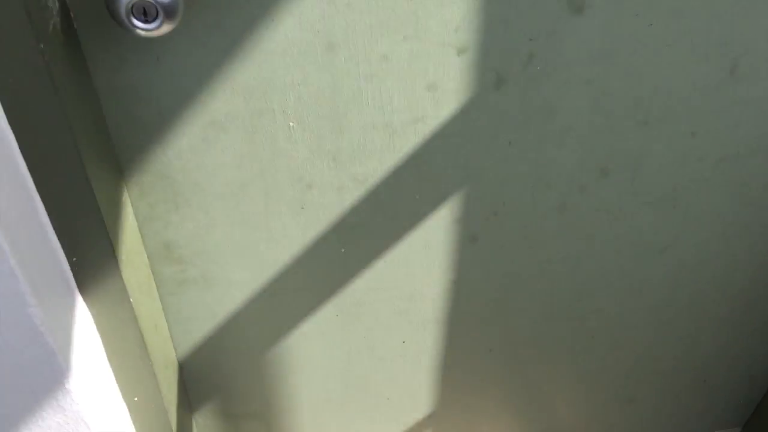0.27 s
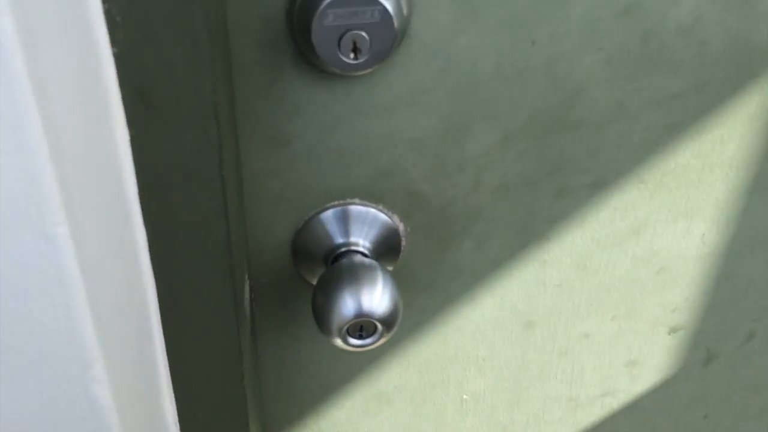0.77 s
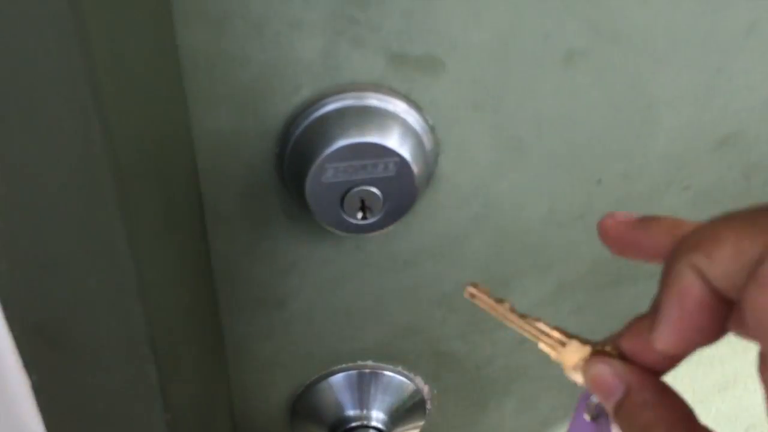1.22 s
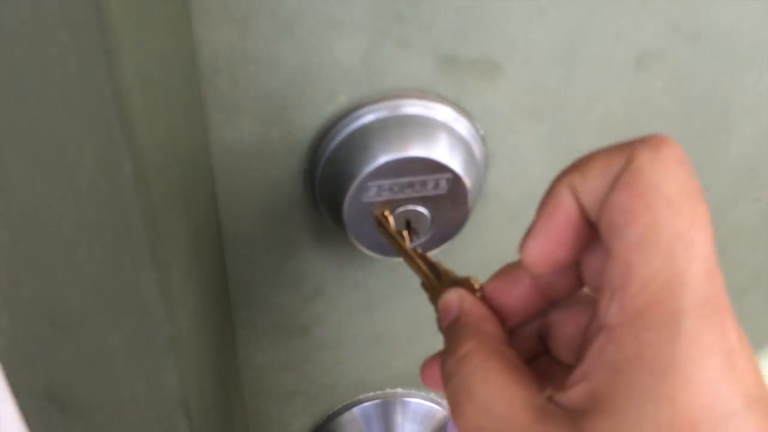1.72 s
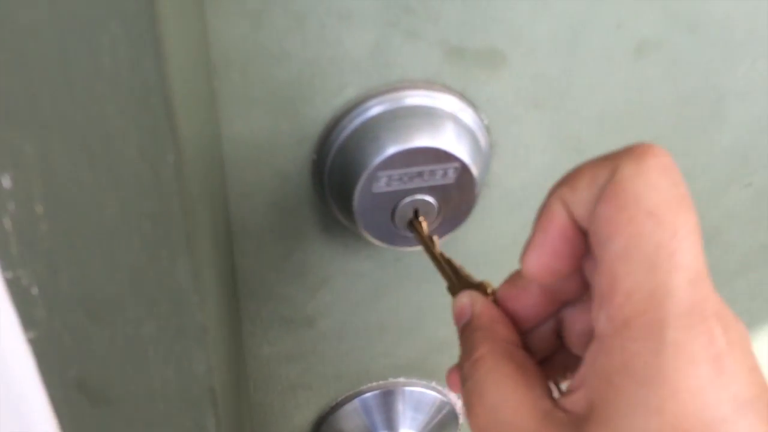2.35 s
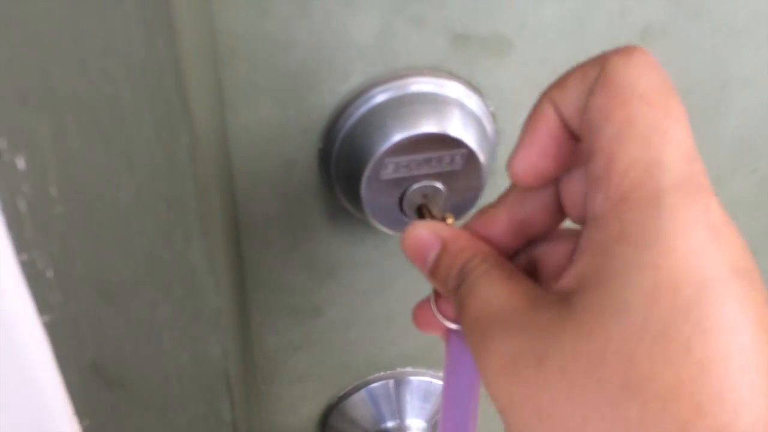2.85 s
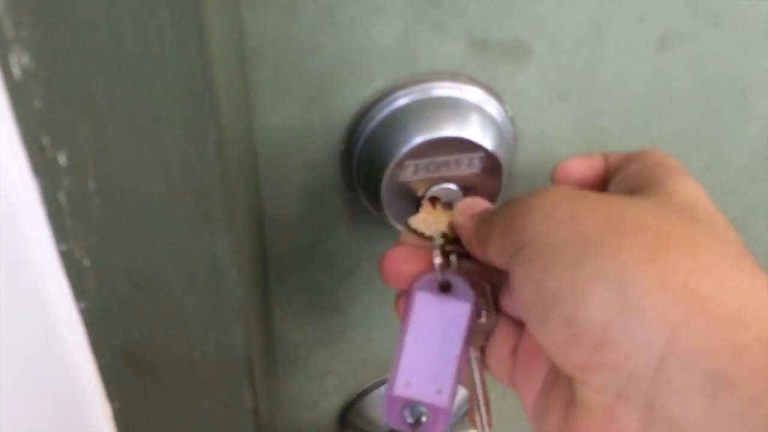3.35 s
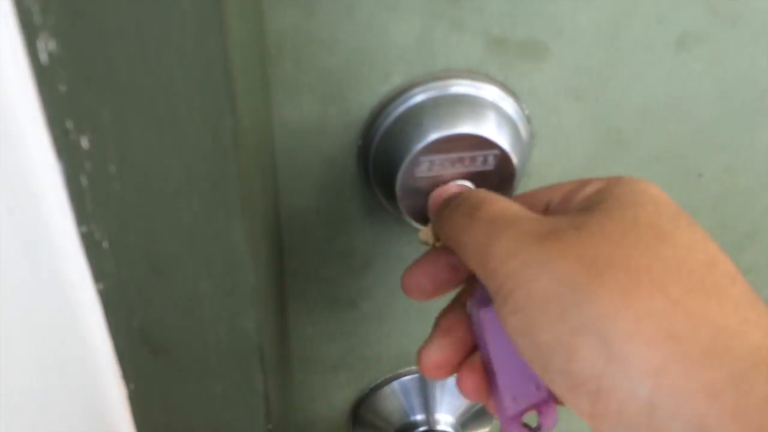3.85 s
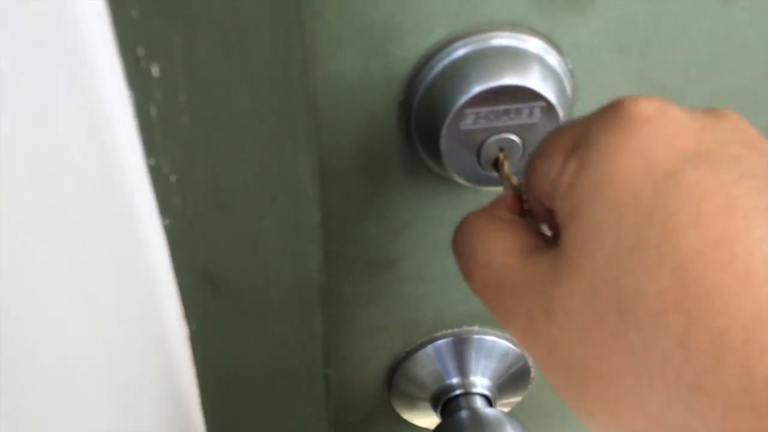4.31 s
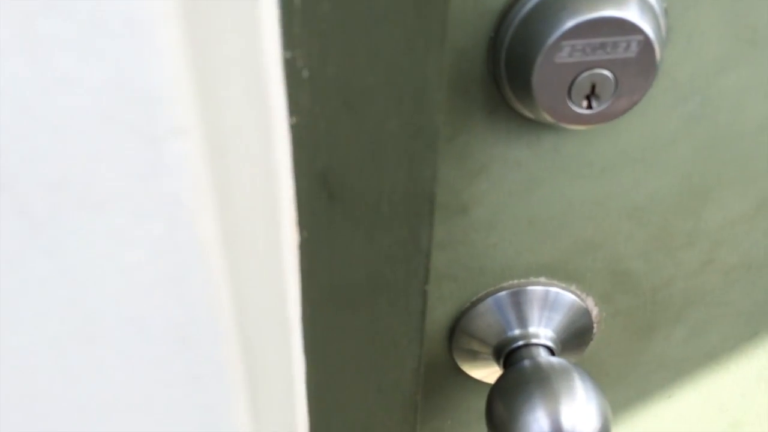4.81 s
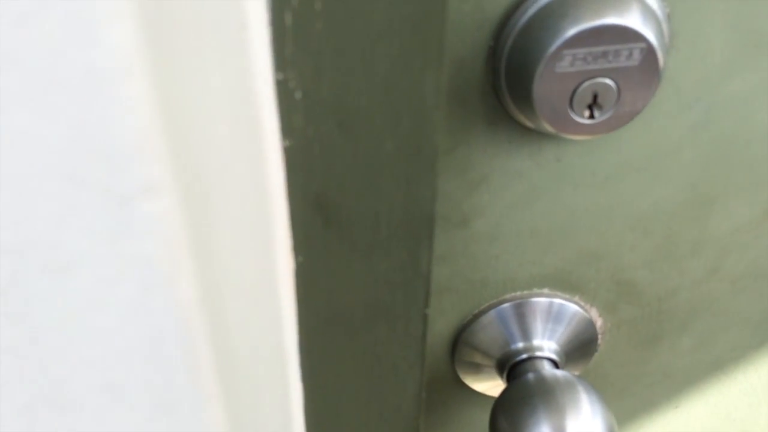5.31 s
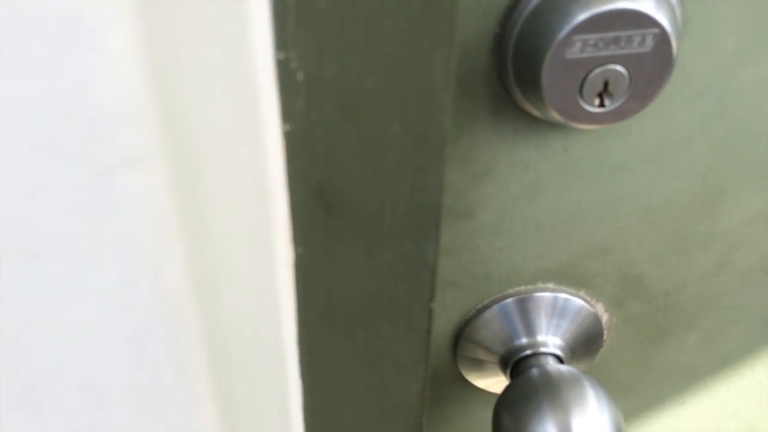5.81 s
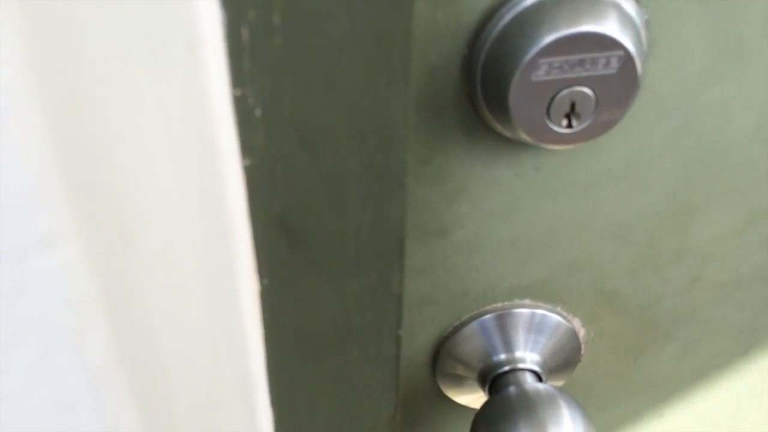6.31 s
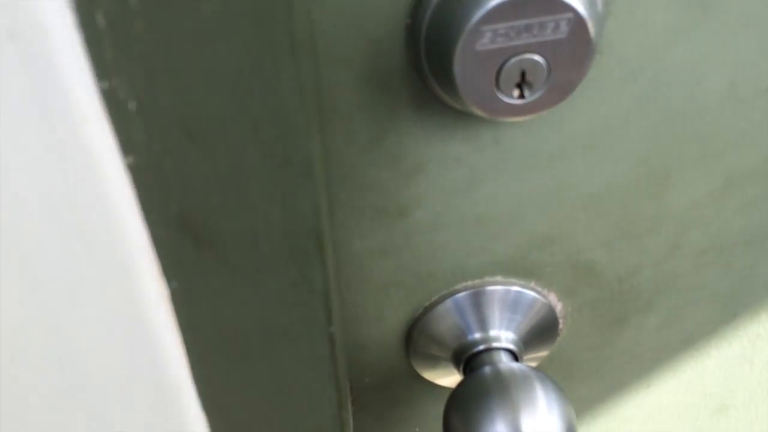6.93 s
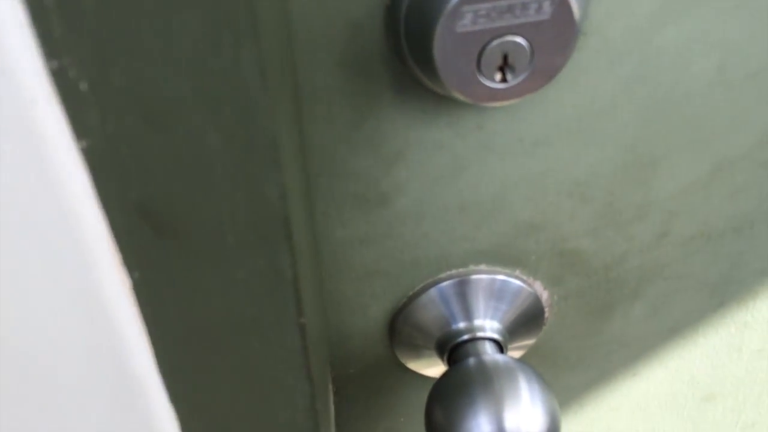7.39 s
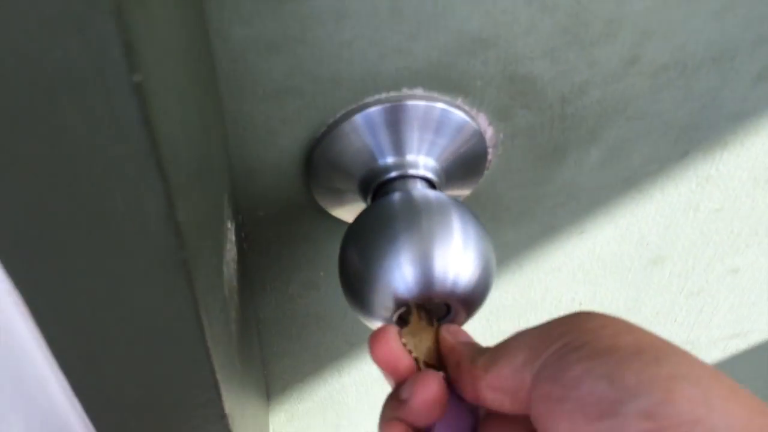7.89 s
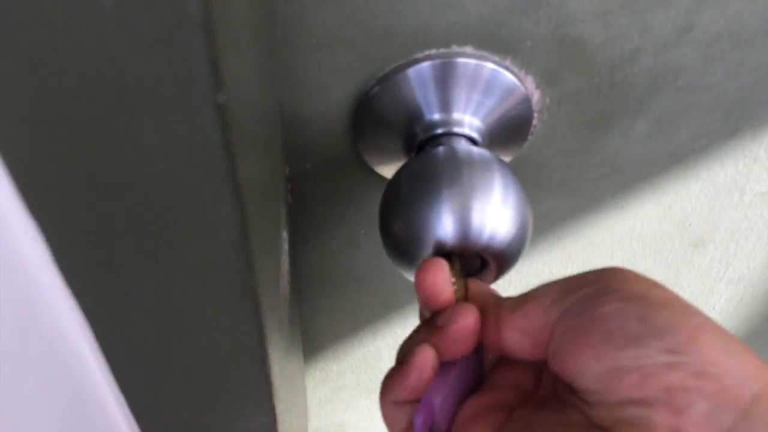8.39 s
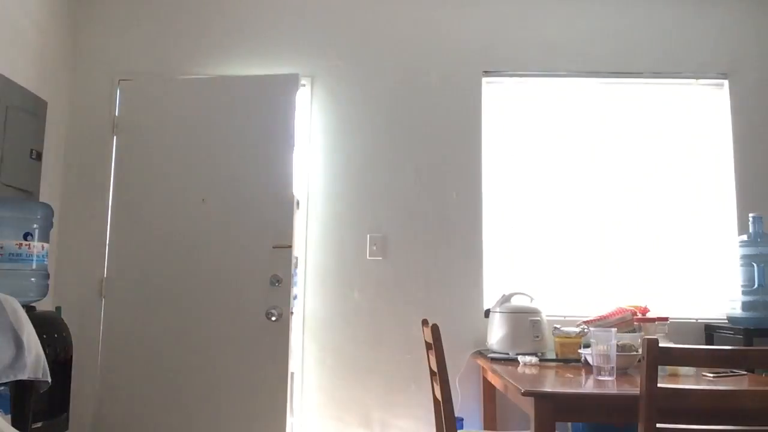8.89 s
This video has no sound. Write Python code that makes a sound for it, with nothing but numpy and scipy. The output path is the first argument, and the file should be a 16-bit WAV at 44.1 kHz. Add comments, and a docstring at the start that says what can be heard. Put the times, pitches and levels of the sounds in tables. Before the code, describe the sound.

A bunch of keys jangles brightly, a key slides into a deadbolt, the bolt clacks over, then a doorknob rattles and clunks, close up over faint outdoor rumble.

```python
"""Keys working a front door lock

A bunch of keys is pulled out, pushed into the deadbolt, turned and drawn out, then worked in the knob.
Keys ring in thin high modes; lock parts, knob and door leaf knock as noise bursts plus their own modes;
brass scrapes as streams of tiny contacts, and the swinging bunch jangles as flurries of small collisions.
A hand-held phone is close by in the doorway, bumped now and then, over a low outdoor rumble and faint wash."""
import sys
import numpy as np
from scipy import signal
from scipy.fft import rfft, irfft, next_fast_len
from scipy.io import wavfile
from scipy.ndimage import uniform_filter1d

SR = 44100
rng = np.random.default_rng(int(sys.argv[2]) if len(sys.argv) > 2 else 0)


def dump(signal):
    """Clip the signal to [-1, 1] and save it as 16-bit WAV at the path in sys.argv[1]."""
    limited = np.clip(np.atleast_2d(signal).T, -1, 1)
    pcm = np.round(limited * 32767).astype(np.int16)
    wavfile.write(sys.argv[1], SR, pcm)


N = 403515
TIME = np.arange(N) / SR
AGE = TIME[:SR // 3]  # time since a contact [s]

# ringing keys, by name: (t60_s, [(pitch_hz, level_db)]); brass is in hand, the rest hang on the split ring
KEY_MODES = {"brass": (.16, [(4070, -21), (5370, -20), (6236, -15), (8080, -17), (9560, -12), (9800, -6),
             (10162, -10), (11700, -16), (12487, -10), (13662, 0), (14900, -16)]),
             "steel": (.16, [(2475, -19), (6750, -20), (7287, -3), (10222, -14), (10903, -12), (11400, -13),
             (12791, 0)]), "small": (.2, [(7390, -9), (9701, -14), (11686, 0), (12586, -4)]),
             "long": (.4, [(4270, 0)]), "short": (.25, [(4620, 0), (12800, 0)]), "ring": (.12, [(6300, -10),
             (10768, -10), (11183, -4), (14007, 0), (14096, -1), (14295, -7), (14426, -2)])}
# modes of lock case, bolt, latch, hollow knob and door leaf, by name: [(pitch_hz, level_db)]
PART_MODES = {"case": [(800, -7), (960, -5), (1205, -6), (1480, -3), (1720, -3), (2230, 1)],
              "bolt": [(440, -9), (590, -5), (935, 3), (1185, -2), (1340, -4), (5500, -5), (8550, -2)],
              "latch": [(600, -10), (1045, -4), (1205, 0), (1325, -1), (1935, -4), (2450, -7), (4480, -8)],
              "knob": [(1520, -7), (1930, 1), (3100, -3), (3500, -6), (7000, -4)], "leaf": [(155, -3),
              (237, 0), (330, 0), (436, -2), (1250, -8)]}
# spectrum of knocks and rubs in lock and door: (pitch_hz, level_db)
KNOCK_COLOUR = [(100, -16.5), (300, -3.5), (600, -2.5), (1100, 2), (1600, -1), (2200, -4), (3200, -8.5),
                (5000, -19.5), (8000, -26), (15000, -36.5)]
# spectrum of hard metal clicks and ticks: (pitch_hz, level_db)
STEEL_COLOUR = [(500, -25.5), (2000, -11), (4000, -4), (6000, -2.5), (8000, 0), (10000, 2), (13500, -2),
                (15500, 1.5)]
UNEVEN_DB = 2.5  # spread of the chance resonances at the spot touched
PLAY_DETUNE = .06  # relative spread of pitch of loose parts and swinging keys


def undb(db):
    """Decibels to gain."""
    return 10 ** (np.asarray(db) / 20)


def unit(x):
    """Scale to rms 1."""
    return x / np.sqrt(np.mean(x ** 2))


def unit_peak(x, size):
    """Scale so that the loudest stretch of size samples has rms 1."""
    return x / np.sqrt(uniform_filter1d(x ** 2, size).max())


def add(track, s, x):
    """Mix x into the track at time s."""
    i = max(int(s * SR), 0)
    track[i:i + len(x)] += x[:max(N - i, 0)]


def colour(x, points, tilt_db=0, uneven_db=0):
    """Minimum-phase filter: a (Hz, dB) spectrum, a tilt per octave (256 Hz to 8 kHz), chance resonances."""
    size = next_fast_len(len(x) + 2048) // 2 * 2
    freq = np.maximum(np.arange(size // 2 + 1) * SR / size, 1)
    octave = np.log2(freq)
    hz, points_db = np.transpose(points)
    db = np.interp(octave, np.log2(hz), points_db)
    db = db + tilt_db * np.clip(octave - 10, -2, 3)
    db = db + uneven_db * np.interp(np.sqrt(freq) / 2, np.arange(80), rng.standard_normal(80))
    # folding the cepstrum keeps the filter causal, so attacks stay sharp
    cepstrum = irfft(np.log(undb(db)))
    cepstrum[1:size // 2] *= 2
    cepstrum[size // 2 + 1:] = 0
    return irfft(rfft(x, size) * np.exp(rfft(cepstrum)))[:len(x)]


def fade(t60):
    """Exponential decay by 60 dB in t60 seconds."""
    return np.exp(-np.log(1000) * AGE / max(t60, 1e-4))


def walk(rate, time=TIME):
    """Smooth random drift with a spread near 1 and rate random steps a second."""
    steps = rng.standard_normal(1024)
    return np.interp(time * rate, np.arange(len(steps)), steps)


def grains(size, rate, spread_db):
    """Random tiny contacts, about rate of them a second, of uneven strength."""
    present = rng.random(size) < rate / SR
    sign = rng.choice([-1, 1], size)
    return present * sign * undb(spread_db * np.clip(rng.standard_normal(size), -2, 2))


def ring(modes, scatter_db):
    """Free vibration of (Hz, dB, t60) modes; chance in the point of contact sets the share of each."""
    tone = 0
    for hz, db, t60 in modes:
        share = undb(db + scatter_db * rng.standard_normal()) * rng.choice([-1, 1])
        tone = tone + share * fade(t60) * np.sin(2 * np.pi * hz * AGE)
    return tone


def resonate(x, hz, t60):
    """One mode driven by x, with a gain of 1 for noise."""
    r = np.exp(-np.log(1000) / (t60 * SR))
    angle = 2 * np.pi * hz / SR
    gain = np.sin(angle) * np.sqrt(2 * (1 - r * r))
    return signal.lfilter([gain], [1, -2 * r * np.cos(angle), r * r], x)


def burst(t60, tail_db, tail_t60):
    """A crack that builds as the surfaces meet, then a weaker tail of tiny rebounds."""
    rebounds = unit(grains(len(AGE), rate=1800, spread_db=-2))
    crack = rng.standard_normal(len(AGE)) * fade(t60)
    return (crack + undb(tail_db) * rebounds * fade(tail_t60)) * (1 - fade(0.0045))


def slide(length, tilt_db):
    """Surfaces catch and slip in a gritty stream that swells quickly and dies away."""
    progress = np.minimum(AGE / length, 1)
    pressure = np.sin(np.pi * progress ** 0.61) * undb(2.5 * walk(160, AGE))
    grit = grains(len(AGE), rate=3500, spread_db=0.0)
    return pressure * unit(colour(grit, KNOCK_COLOUR, tilt_db, UNEVEN_DB))


def clinks():
    """Each touch gives a hard click and rings one key, most strongly in the modes the contact favours."""
    # key against key or lock face: (start_s, ring_db, click_db, key, favoured_hz)
    touches = [(0.816, -32, -46, "brass", 13700), (0.859, -31.5, -27, "small", 11700),
               (.878, -45, -42.5, "long", 4270), (.941, -24.5, -20, "brass", 10020),
               (0.996, -49.5, -26.5, "small", 9900), (1.012, -42.5, -45.5, "long", 4270),
               (1.104, -28, -24.5, "ring", 14300), (1.115, -20.5, -31, "ring", 12300),
               (1.137, -28.5, -29, "ring", 14600), (1.187, -35.5, -36.5, "brass", 12760),
               (1.403, -45.5, -37.5, "brass", 9900), (1.77, -17.5, -21, "brass", 9900),
               (1.8, -36, -33, "brass", 12300), (2.496, -47, -29, "brass", 10000),
               (2.534, -38.5, -52, "brass", 9860), (3.064, -20, -34, "brass", 14050),
               (3.116, -27.5, -32.5, "brass", 10250), (3.227, -25, -30, "brass", 13600),
               (3.281, -30.5, -32, "brass", 13700), (3.583, -40.5, -37.5, "brass", 12600),
               (3.809, -34.5, -39.5, "brass", 10190), (3.964, -39.5, -35, "brass", 10040),
               (4.514, -28.5, -34, "brass", 13500), (4.768, -21.5, -30, "steel", 11740),
               (4.823, -38.5, -36, "steel", 7300), (7.357, -29.5, -31, "brass", 13700),
               (7.528, -58, -55.5, "short", 4620), (7.661, -54.5, -46.5, "short", 12800),
               (8.18, -50.5, -46, "small", 12120), (8.658, -46, -35, "brass", 9900)]
    contact_db, contact_octaves = 7, 0.078  # lift of modes near the favoured pitch, and its reach
    grip_detune = .005  # relative spread of pitch of the held key from touch to touch
    choke_s = 0.047  # damping time of the held key after a light touch
    press_db, press_db_per_halving = -30.5, 10.5  # clicks above press_db shorten the ring
    graze_s, graze_db = 0.0083, -18.5  # a swinging key grazes its neighbour just before the touch
    out = np.zeros(N)
    for s, ring_db, click_db, key, favoured_hz in touches:
        t60, free = KEY_MODES[key]
        detune = grip_detune * (key == "brass") * rng.standard_normal(len(free))
        modes = []
        for (hz, db), shift in zip(free, detune):
            distance = np.log2(hz / favoured_hz) / contact_octaves
            modes.append((hz * (1 + shift), db + contact_db * np.exp(-distance ** 2), t60))
        # the ring flutters as the key chatters against its neighbours
        tone = ring(modes, scatter_db=2) * undb(2.5 * walk(400, AGE))
        if key == "brass":
            # the harder the held key lands, the sooner it is choked
            choke = choke_s * 2 ** (-max(click_db - press_db, 0) / press_db_per_halving)
            tone = tone * np.exp(-(AGE / choke) ** 2)
        else:
            graze = unit_peak(tone, size=88) * fade(0.04)
            add(out, s - graze_s, undb(ring_db + graze_db) * graze)
        crack = burst(t60=.005, tail_db=-16, tail_t60=.07)
        click = unit_peak(colour(crack, STEEL_COLOUR, 0, UNEVEN_DB), size=88)
        add(out, s, undb(ring_db) * unit_peak(tone, size=88) + undb(click_db) * click)
    return out


def jangle():
    """The harder the bunch is shaken, the louder and more often keys collide, in flurries."""
    sing_db, chafe_db = -19, -20  # keys sliding on each other: their singing modes; their hiss
    shake_db = shaking()
    rate = np.interp(shake_db, [-60, -30], [90, 380])  # typical collisions per second
    hits = [collision() for _ in range(64)]
    chance, strength_db = rng.random(N), rng.uniform(-14, 5, N)
    which = rng.integers(len(hits), size=N)
    flurries = undb(4 * walk(35))
    out = np.zeros(N)
    for i in np.flatnonzero(chance < rate * flurries / SR):
        # sparser hits are each stronger, so the rate alone does not set the level
        gain = undb(shake_db[i] + strength_db[i] - 5.5) * np.sqrt(SR / rate[i])
        add(out, i / SR, gain * hits[which[i]])
    # blades also slide on each other between collisions, which keeps their modes softly singing
    hiss = unit(colour(rng.standard_normal(N), STEEL_COLOUR))
    chafe = undb(shake_db + 2 * walk(60)) * hiss
    singing = np.zeros(N)
    for t60, free in KEY_MODES.values():
        for hz, db in free:
            singing += undb(db / 2) * resonate(chafe, hz, t60)  # halved dB evens out the modes
    return out + undb(chafe_db) * chafe + undb(sing_db) * unit(singing) * chafe.std()


def shaking():
    """How hard the bunch moves, in dB: every swing swells and settles, and the strongest one leads."""
    # swings and jolts of the bunch: (hardest_s, level_db, swell_by_20_db_s)
    swings = [(.95, -38, 0.702), (.845, -33, 0.2568), (.935, -25, 0.2042), (0.994, -31.5, 0.14),
              (1.119, -24.5, 0.0581), (1.822, -26, 0.0382), (1.976, -26.5, 0.0245), (2.15, -45, 0.295),
              (2.62, -49, 0.02), (2.98, -43, 0.2481), (3.24, -36, 0.1266), (3.94, -49.5, 0.584),
              (5.11, -52, 0.09), (6.38, -41.5, 0.1475), (7.501, -51, 0.5)]
    settle_ratio = 0.674  # settling time over swell time: the bunch settles faster than it swells
    held_db = -71.5  # stirring of the keys in a quiet hand
    shake_db = np.full(N, held_db)
    for s, db, swell in swings:
        away = np.maximum(s - TIME, (TIME - s) / settle_ratio)
        shake_db = np.maximum(shake_db, db - 20 * away / swell)
    return shake_db


def collision():
    """Two keys of the bunch meet: a short chafe and a few modes, damped and detuned by the hand."""
    modes = []
    for key in ("brass", "small", "ring"):
        t60, free = KEY_MODES[key]
        modes += [(hz, db / 2, t60 / 2) for hz, db in free]
    struck = [modes[i] for i in rng.choice(len(modes), size=5, replace=False)]
    detuned = [(hz * (1 + PLAY_DETUNE * rng.standard_normal()), db, t60) for hz, db, t60 in struck]
    tone = ring(detuned, scatter_db=3)
    crack = burst(t60=0.0059, tail_db=-19.0, tail_t60=0.052)
    chafe = colour(crack, STEEL_COLOUR, 0, UNEVEN_DB)
    hit = unit(tone) + unit(chafe)
    return hit[:SR // 5] / np.sqrt(len(hit))


def knocks():
    """Each knock is a dense noise burst with a steel tick, over the ringing modes of one part."""
    # knocks of lock parts, knob and door leaf, and a footstep at the start:
    # (start_s, knock_db, tick_db, tilt_db_per_octave, part)
    strikes = [(0.268, -36, -70, 2, "leaf"), (1.094, -31, -31, -0.5, "case"),
               (1.115, -32.5, -39, 2, "case"), (1.77, -29, -27.5, 3.5, "case"),
               (1.8, -37.5, -39.5, -2, "case"), (2.497, -32.5, -62, 2.5, "case"),
               (2.668, -45.5, -35.5, -3, "case"), (3.001, -34, -28.5, -3.5, "latch"),
               (3.05, -32.5, -25.5, 2, "case"), (3.261, -35.5, -29, -1, "case"),
               (3.372, -34, -39.5, 0.5, "case"), (3.444, -29, -17.5, 3.5, "bolt"),
               (3.449, -20, -19, 1, "bolt"), (3.482, -35, -18.5, 23.5, "bolt"),
               (5.978, -37, -44.5, -2.5, "latch"), (6.165, -40, -42.5, 0, "latch"),
               (6.358, -28, -35.5, 2.5, "case"), (6.364, -28.5, -33.5, -4.5, "latch"),
               (6.382, -34, -32, -1.5, "leaf"), (6.389, -30.5, -47.5, -1, "latch"),
               (6.457, -41, -31.5, -1, "case"), (6.901, -39.5, -30, 5.5, "case"),
               (6.951, -22.5, -18.5, 2.5, "latch"), (6.957, -26, -33.5, 3, "latch"),
               (7.257, -25, -35.5, 2, "latch"), (7.273, -26.5, -32, 1.5, "latch"),
               (7.298, -40, -37, 4.5, "latch"), (7.381, -30, -33, 3.5, "latch"),
               (7.902, -38, -46.5, 2, "case"), (7.936, -36.5, -38, -2, "latch"),
               (8.13, -35, -46.5, 3.5, "knob"), (8.183, -37.5, -36, 3, "case"),
               (8.249, -34, -49.5, -2, "leaf"), (8.417, -21.5, -28, 6.5, "knob"),
               (8.422, -29.5, -36.5, 6, "knob"), (8.547, -36.5, -50, -6.5, "leaf"),
               (8.576, -31.5, -40, 5, "latch"), (8.613, -34, -24.5, -2.5, "case"),
               (8.619, -30.5, -44, 2, "latch"), (8.705, -33.5, -49.5, -4, "leaf")]
    part_t60_s, part_damping = 0.075, 0.46  # mode t60 at 1 kHz; power of frequency that shortens it
    part_rise_s = .007
    part_db, body_db = -2, -2  # shares of a knock: clear modes; dense, noisy body
    # a second, duller contact follows each knock: delay, level, tilt per octave
    seat_s, seat_db, seat_tilt_db = .0045, -13, -2
    out = np.zeros(N)
    for s, knock_db, tick_db, tilt_db, part in strikes:
        t60 = 0.0572 * np.exp(-.2 * tilt_db)  # brighter knocks die away sooner
        thump = burst(t60, tail_db=-30.5, tail_t60=0.098)
        body = unit_peak(colour(thump, KNOCK_COLOUR, tilt_db, UNEVEN_DB), size=132)
        modes = [(hz, db, part_t60_s * (1000 / hz) ** part_damping) for hz, db in PART_MODES[part]]
        # a part that stays pressed home damps the ringing
        ringing = ring(modes, scatter_db=2) * fade(5 * t60) * (1 - fade(part_rise_s))
        knock = undb(body_db) * body + undb(part_db) * unit_peak(ringing, size=132)
        tick = burst(t60=0.013, tail_db=-22.5, tail_t60=0.096)
        tick = unit_peak(colour(tick, STEEL_COLOUR, -2.3, UNEVEN_DB), size=88)
        add(out, s, undb(knock_db) * knock + undb(tick_db) * tick)
        seat = burst(t60=0.11, tail_db=-23.5, tail_t60=0.3)
        seat = unit_peak(colour(seat, KNOCK_COLOUR, seat_tilt_db, UNEVEN_DB), size=132)
        add(out, s + seat_s, undb(knock_db + seat_db) * seat)
        # a soft gritty noise starts just before most knocks (with those of the case) and runs on under them
        lead_s = .009 * (part != "case")
        add(out, s - lead_s, undb(knock_db - 15) * slide(.05, tilt_db))
    return out


def rattles():
    """A loose part chatters in a run of soft contacts and a few ticks; its modes shift with its seat."""
    # parts shifting in their play as key and knob are handled: (start_s, level_db, part)
    shifts = [(0.156, -38, "knob"), (2.008, -42.5, "latch"), (2.176, -50, "case"), (2.243, -50, "latch"),
              (2.294, -45.5, "latch"), (2.537, -44.5, "latch"), (3.028, -47, "case"), (3.359, -39, "case"),
              (3.419, -38.5, "knob"), (3.603, -51, "case"), (3.728, -47.5, "knob"), (3.759, -47, "knob"),
              (3.812, -43, "case"), (3.877, -47, "case"), (4.018, -45.5, "latch"), (4.572, -43, "latch"),
              (4.945, -44, "case"), (5.076, -45.5, "case"), (5.437, -38.5, "latch"), (5.533, -43, "latch"),
              (5.756, -50, "case"), (5.829, -37.5, "case"), (5.905, -47.5, "case"), (5.948, -39.5, "case"),
              (6.147, -39.5, "latch"), (6.254, -48, "latch"), (6.307, -42.5, "latch"),
              (6.421, -36.5, "latch"), (6.553, -39.5, "case"), (6.634, -46.5, "knob"),
              (6.703, -40.5, "latch"), (6.731, -41, "latch"), (7.322, -41, "case"), (7.482, -46, "case"),
              (7.572, -46, "latch"), (8.016, -40, "case"), (8.066, -49, "knob"), (8.433, -40.5, "latch")]
    run_t60_s, ring_t60_s = 0.1032, 0.0563  # decay of the run of contacts; of the part at 1 kHz
    dry_tilt_db, tick_db = 2, -16.5  # tilt per octave of the dry contacts; share of steel ticks
    out = np.zeros(N)
    for s, db, part in shifts:
        contacts = grains(len(AGE), rate=1500, spread_db=4) * fade(run_t60_s)
        modes = np.zeros(len(AGE))
        for hz, mode_db in PART_MODES[part]:
            shifted_hz = hz * (1 + PLAY_DETUNE * rng.standard_normal())
            gain = undb(mode_db) * min(1000 / hz, 1)  # soft contacts excite high modes less
            modes += gain * resonate(contacts, shifted_hz, ring_t60_s * 1000 / hz)
        dry_contacts = colour(contacts, KNOCK_COLOUR, dry_tilt_db, 2 * UNEVEN_DB)
        # squaring leaves ticks mostly to the hardest contacts
        ticks = colour(contacts * np.abs(contacts), STEEL_COLOUR, -2.5, UNEVEN_DB)
        chatter = unit(modes) + unit(dry_contacts) + undb(tick_db) * unit(ticks)
        add(out, s, undb(db) * unit_peak(chatter, size=132))
    return out


def pins():
    """Sprung pins snap over the key one by one, each with a tick and a small ring of the lock case."""
    # teeth riding over the pins, going in, settling and coming out: (start_s, level_db)
    snaps = [(2.893, -37.5), (2.908, -43), (2.953, -35), (2.967, -37.5), (2.98, -34), (2.989, -32),
             (3.782, -36), (4.32, -34.5), (4.329, -27.5), (4.352, -35), (4.372, -30.5), (4.393, -32),
             (4.416, -37)]
    case_db = -15.5  # the lock case's answer to a pin
    out = np.zeros(N)
    for s, db in snaps:
        crack = burst(t60=0.00284, tail_db=-22.5, tail_t60=0.07)
        tick = unit_peak(colour(crack, STEEL_COLOUR, 0, UNEVEN_DB), size=88)
        modes = [(hz, mode_db, .05) for hz, mode_db in PART_MODES["case"]]
        case = unit_peak(ring(modes, scatter_db=3), size=132)
        add(out, s, undb(db) * (tick + undb(case_db) * case))
    return out


def rubs():
    """Key, fingers and knob slide in gritty friction; a dull, heavy rub also shakes the door leaf."""
    # things sliding along lock and door, then a last soft swish as the rumble falls away: (start_s, end_s,
    # level_db, tilt_db_per_octave)
    strokes = [(0.211, 0.291, -47.5, 5), (0.259, 0.427, -48, -3.5), (0.808, 0.881, -38, 9),
               (1.28, 1.405, -42.5, 7.5), (1.943, 2.013, -47.5, -0.5), (2.151, 2.353, -58, 1.5),
               (2.882, 3.239, -48.5, -1.5), (3.231, 3.304, -45, 1), (3.38, 3.505, -50, 3),
               (4.561, 4.739, -54.5, -2.5), (6.292, 6.476, -40, -2), (7.231, 7.307, -41.5, 1),
               (7.5, 7.816, -55, -9.5), (7.901, 7.984, -41.5, -1), (8.516, 8.65, -39.5, 0),
               (8.695, 8.861, -47, -1.5), (8.871, 9.104, -49, 4)]
    leaf_low_hz, leaf_low_db = 112.2, -7  # lowest flexing of the door leaf
    out = np.zeros(N)
    for start, end, db, tilt_db in strokes:
        rub = slide(max(end - start, .02), tilt_db)
        push = np.abs(rub) * rng.standard_normal(len(rub))
        leaf = resonate(push, hz=235, t60=0.033)
        leaf = leaf + undb(leaf_low_db) * resonate(push, hz=leaf_low_hz, t60=0.016)
        leaf_db = min(-8.0 - 4 * tilt_db, 0)  # duller rubs shake it more
        add(out, start, undb(db) * (rub + undb(leaf_db) * leaf))
    return out


def bumps():
    """Thuds and a tap of about one cycle through the phone's case."""
    # the hand bumps and taps the phone: (start_s, level_db, pitch_hz)
    thuds = [(0.386, -22.5, 95), (4.021, -35, 96.5), (4.569, -29.5, 88.2), (8.25, -14.5, 1325),
             (8.49, -30.5, 64.5), (8.578, -28.5, 71.8)]
    out = np.zeros(N)
    for s, db, hz in thuds:
        cycles = hz * AGE
        swell = 2 * cycles * np.exp(1 - 2 * cycles)
        add(out, s, -undb(db) * np.sin(2 * np.pi * cycles) * swell)
    return out


def outdoors():
    """Coloured noise split in two: an unsteady low rumble under a distant wash that drifts with it."""
    # spectrum of the outdoor air: (pitch_hz, level_db)
    air_colour = [(20, -34.5), (55, 1), (90, 0.5), (175, 1), (290, -12), (560, -22.5), (900, -23),
                  (2000, -32), (5000, -43.5), (10000, -51.5), (15500, -60)]
    rumble_db, wash_db = -46, -42.5  # the wash is scaled by the rms of the low band
    arrive_s, approach_db = 1.9, -3.5  # the rumble is weaker until the phone is in the door recess
    fall_s, fall_db_per_s = 8.722, 36  # from here the rumble falls away
    air = colour(rng.standard_normal(N), air_colour) * undb(1.5 * walk(6))
    low = signal.sosfiltfilt(signal.butter(2, 350, fs=SR, output="sos"), air)
    unsteady = undb(2 * walk(12))
    approach = approach_db * np.clip((arrive_s - TIME) / 0.16, 0, 1)
    fall = -fall_db_per_s * np.maximum(TIME - fall_s, 0)
    rumble = unit(low) * undb(rumble_db + approach + fall) * unsteady
    wash = (air - low) / low.std() * undb(wash_db)
    return rumble + wash


def doorway(x, wet_db, t60):
    """The door frame and porch walls return a short, duller tail of decaying noise."""
    dull = signal.butter(1, 6000, fs=SR, output="sos")
    tail = signal.sosfilt(dull, rng.standard_normal(len(AGE))) * fade(t60) * (AGE > .004)
    return x + undb(wet_db) * signal.fftconvolve(x, tail / np.linalg.norm(tail))[:N]


def scene():
    """Keys and lock in the doorway, with bumps on the phone and the outdoors behind."""
    near = clinks() + knocks() + rattles() + pins() + rubs() + jangle()
    return (doorway(near, wet_db=-22.0, t60=0.33) + bumps() + outdoors())[None]


def record(dry):
    """The phone cuts the top steeply above 15.4 kHz."""
    return signal.sosfilt(signal.ellip(10, .2, 70, 15400, fs=SR, output="sos"), dry)


dry = scene()
out = record(dry)
dump(out)
```